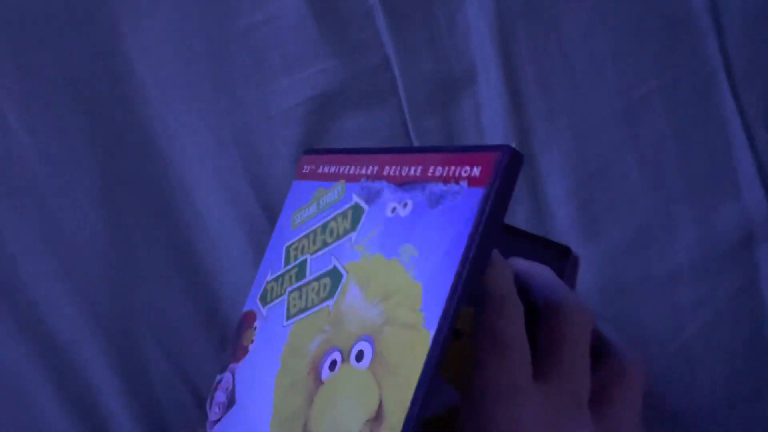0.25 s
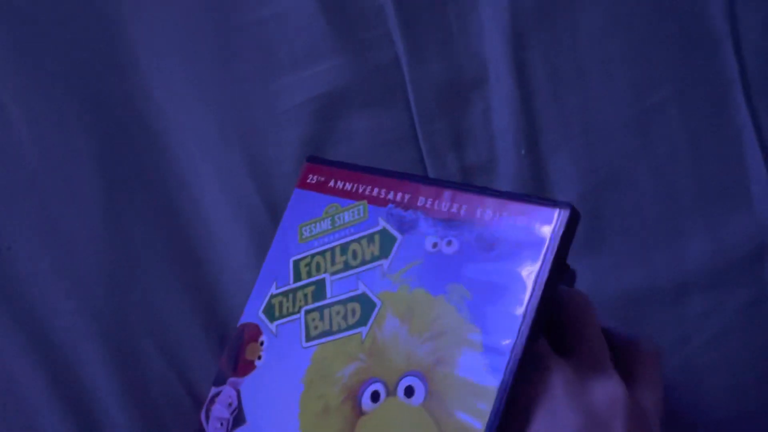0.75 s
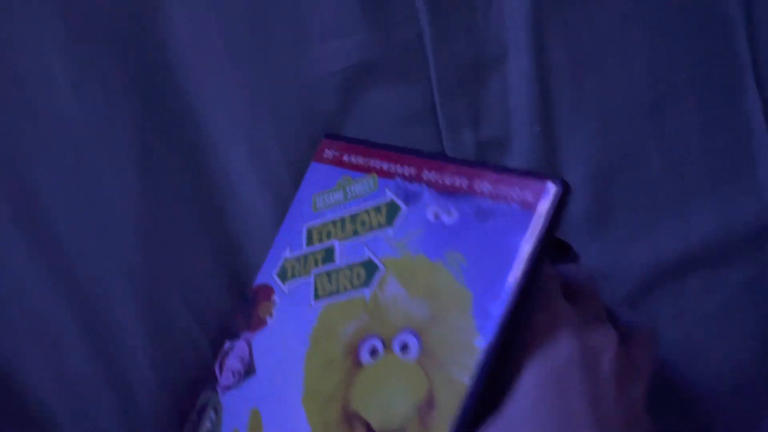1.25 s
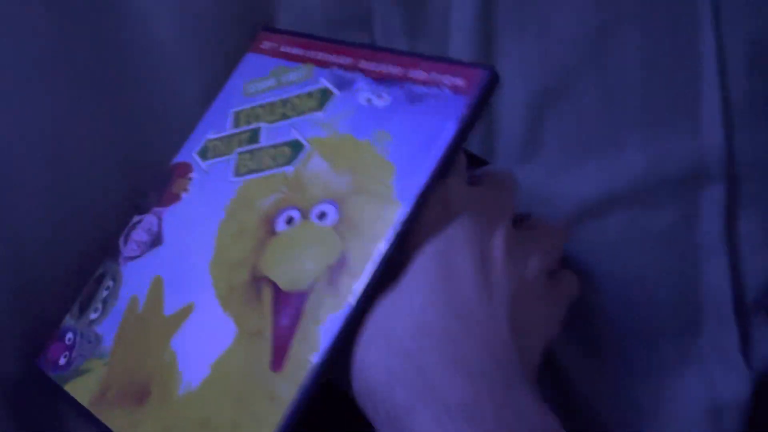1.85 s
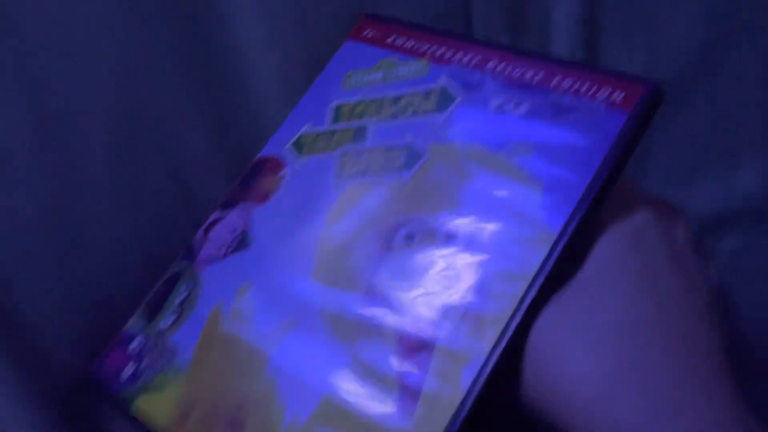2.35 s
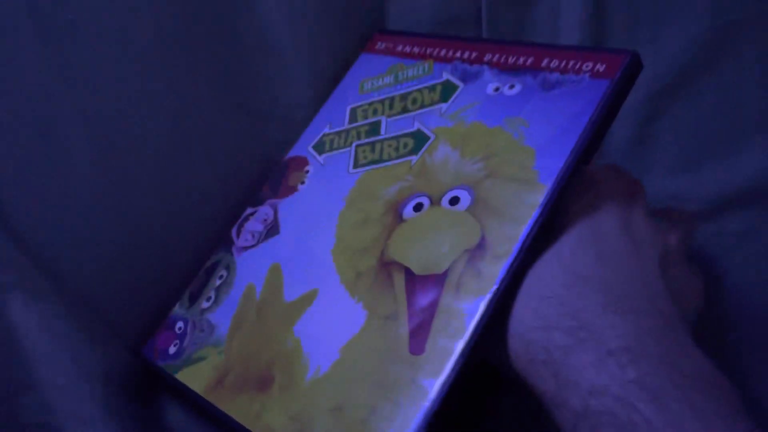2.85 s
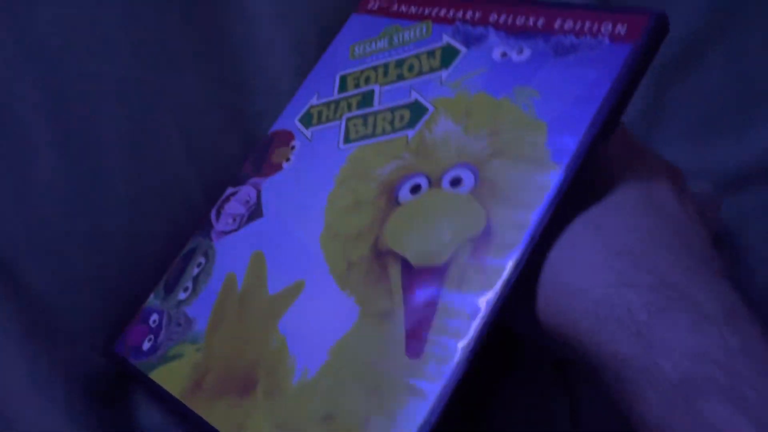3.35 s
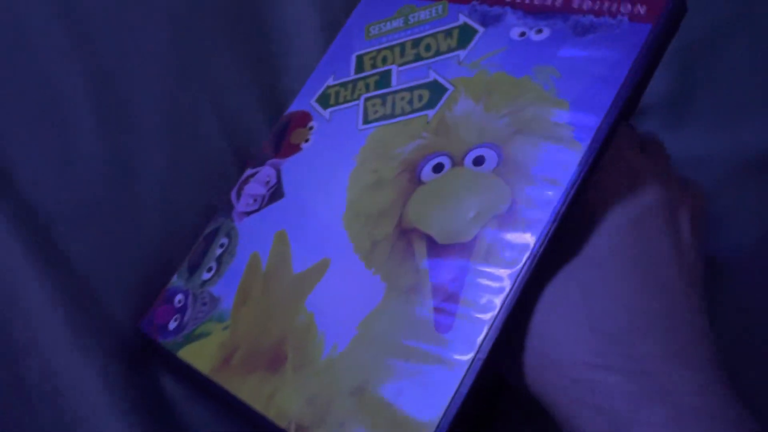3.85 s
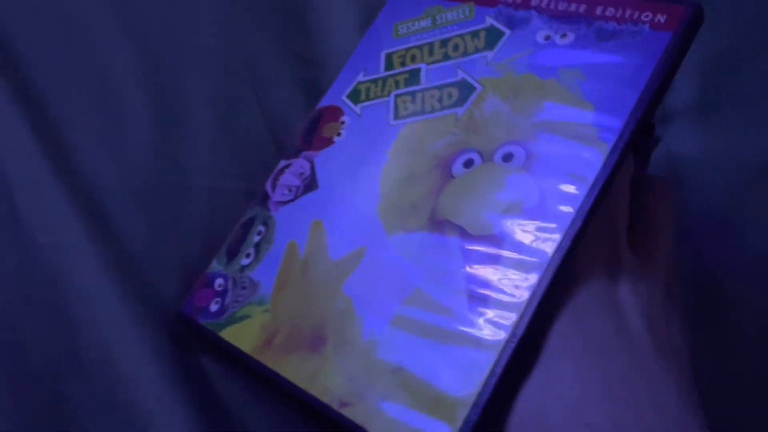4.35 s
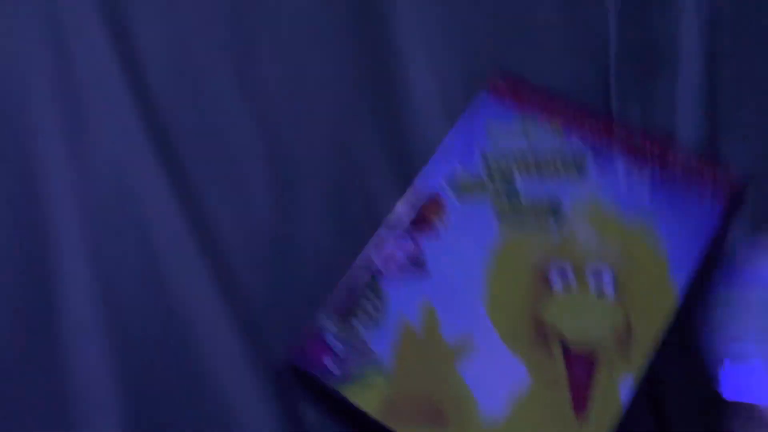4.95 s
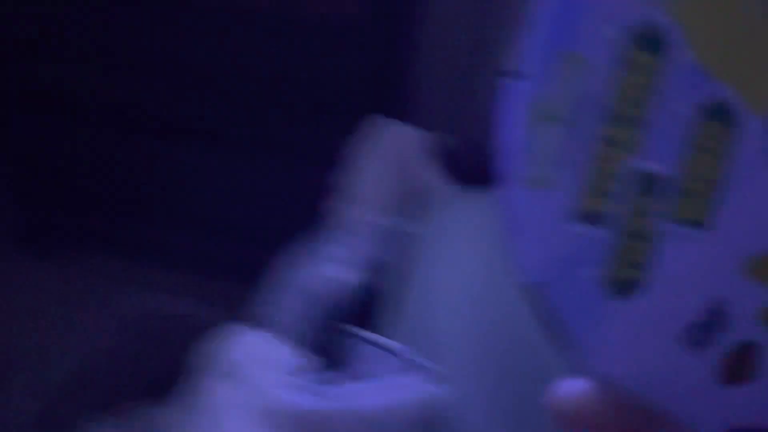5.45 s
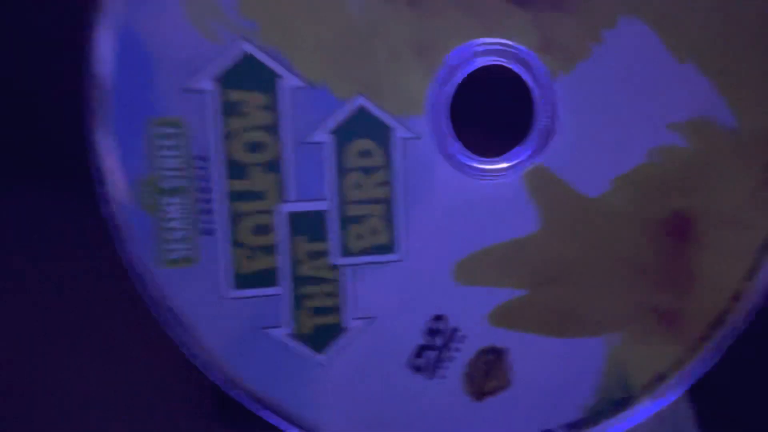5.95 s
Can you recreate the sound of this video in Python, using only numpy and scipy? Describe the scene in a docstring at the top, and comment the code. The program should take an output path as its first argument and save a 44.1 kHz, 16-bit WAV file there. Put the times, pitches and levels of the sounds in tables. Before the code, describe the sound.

A near stereo microphone catches skin rubbing and squeaking on thin plastic, dull padded knocks and cloth scuffs. The case snaps sharply, loudest just before three seconds, with a brief hollow ring. It calms into sparse ticks and light brushing, then clicks more weakly, bumps again and ends with soft sliding, all over a steady low hum and short room echoes.

```python
"""A steady fan-like hum, a sum of wavering sines in soft noise, lies under the handling of a half-closed
plastic case on a bed. First come padded thuds (stretching sines), ticks and sliding skin (random slips). From
1.2 s hub and disc snap as chirped impulses on a resonant shell, hardest near 2.9 s. Light ticks, two of them
bright nail ticks near 4.6 s, lead to weaker snaps at 4.9-5.0 s; after the last thuds and a sharp tick near 5.7
s the disc is lifted out and skin slides on. Near echoes and a small room surround all the handling."""
import sys
import numpy as np
from scipy import signal
from scipy.fft import rfft, irfft, next_fast_len
from scipy.io import wavfile

SR = 44100
rng = np.random.default_rng(int(sys.argv[2]) if len(sys.argv) > 2 else 0)


def log_audio(samples):
    """Write samples as a 16-bit WAV file to the path given in sys.argv[1]."""
    # one column per channel
    frames = np.atleast_2d(samples).T
    # limit to full scale, then quantise
    limited = np.clip(frames, -1, 1)
    pcm = np.round(limited * 32767).astype(np.int16)
    wavfile.write(sys.argv[1], SR, pcm)


N = 273861

# Steady tones of the hum. Each row: mean frequency in Hz, rms level in dB before its flutter.
HUM_TONES = [(91.5, -48), (150.7, -64), (180, -56.5), (276, -66.5)]
# Spectrum of the still air. Each row: frequency in Hz, relative density in dB per Hz.
AIR_SPECTRUM = [(20, -57), (40, -2.5), (65, 2.5), (110, 2.5), (190, -4), (300, -10.5), (550, -17),
                (950, -18.5), (2200, -22.5), (3200, -30), (5500, -44), (12000, -46.5), (15000, -64)]
# Decay of the room. Each row: frequency in Hz, t60 in s, level of the tail in dB.
ROOM_DECAY = [(100, 0.064, -17), (392, 0.13, -9), (1480, 0.23, -14.5), (3000, 0.24, -12.5),
              (5500, 0.28, -11.5), (11240, 0.18, -10.5), (16000, 0.11, -18)]
# Spacing of the microphone ports. Each row: frequency in Hz, left minus right in dB,
# phase by which left leads in radians.
PORT_DIFFERENCE = [(100, -1, .12), (350, .2, .22), (800, 2.3, .25), (1500, 3.2, .25), (2300, 3.7, .55),
                   (3700, 3.4, .35), (5100, 3.2, .9), (6800, 1, -.9), (7900, 0, -2.9), (8800, 0, -3.4),
                   (10400, 0, -5.9), (12800, 0, -6.9), (14200, 0, -9.1), (16500, 0, -10.1)]
# Weight of the part that sets the ports apart. Each row: frequency in Hz, gain in dB.
SIDE_SPECTRUM = [(200, 1.5), (1400, 8.5), (3500, 0.5), (5500, -4), (7000, 5), (7900, -21), (16000, -10)]
# Friction spectra of the scuffed sheet, the rubbing skin and the hiss of light sliding.
# Each row: frequency in Hz, relative density in dB per Hz.
SCUFF_SPECTRUM = [(40, 15), (80, 28), (200, 13.5), (400, 7), (800, -2), (1200, -8), (2200, -73),
                  (5000, -47)]
RUB_SPECTRUM = [(400, 9), (900, 3.5), (1400, 6), (2000, 6), (2700, -5), (3600, -34), (5000, -37.5),
                (9000, -44)]
HISS_SPECTRUM = [(1200, 4.5), (2800, -0.5), (4400, 3.5), (5600, 1), (7100, 1), (8300, -2), (9400, -1.5),
                 (12300, -8.5), (13600, -14), (15300, -4.5), (17000, -24)]
# Effort of the arm on the sheet. Each row: time in s, level of the scuff in dB.
ARM_EFFORT = [(0, -62.5), (.33, -80.5), (.52, -67), (.62, -96), (.92, -84), (1.2, -58.5), (1.45, -65.5),
              (1.68, -64.5), (2.02, -55), (2.2, -55.5), (2.45, -65), (2.8, -76.5), (3.27, -77.5),
              (3.7, -73), (4.45, -69), (5.25, -72.5), (5.47, -62), (5.52, -56), (5.9, -64), (6.2, -64)]
# Finger strokes over the plastic. Each row: start in s, length before the release in s, hiss in dB and
# rub in dB (both before the loss and sag of the stroke), brightness of the hiss in dB per octave.
FINGER_STROKES = [(0.15, 0.079, -60.5, -57, -6), (0.36, 0.084, -73.5, -62, 16.5),
                  (0.622, 0.18, -64.5, -78, -7), (1.166, 0.1, -46, -64, -1), (1.295, 0.08, -50.5, -61, -2),
                  (1.49, 0.041, -54, -37, 5), (1.746, .11, -56, -60, 3), (1.936, 0.12, -78, -86, -6),
                  (2.206, 0.14, -55.5, -79, 3), (2.51, 0.036, -48.5, -45, -1),
                  (2.572, 0.074, -55.5, -47.5, -6), (3.187, 0.041, -66, -76, 5),
                  (3.348, 0.19, -64.5, -83, 3), (3.601, 0.093, -57, -71, -2.5),
                  (3.804, 0.091, -59.5, -85, -8), (4.026, 0.12, -55, -68, -2), (4.214, 0.062, -66, -91, -8),
                  (4.423, 0.031, -60, -86, -12), (4.51, 0.12, -59, -56, -10), (4.57, 0.083, -51.5, -78, -3),
                  (4.62, 0.078, -60, -65, 2), (4.716, 0.021, -50, -55, 3), (4.774, 0.068, -94, -60, 40),
                  (5.059, 0.051, -49.5, -50, 1.5), (5.146, 0.031, -46, -57, 2.5),
                  (5.2, 0.13, -52.5, -55.5, 2), (5.356, 0.29, -63, -48, -4), (5.934, 0.15, -74, -51, 16),
                  (6.103, 0.27, -83, -54.5, 20)]
# Stick-slip of dragged fingertips. Each row: start in s, length in s, level of the ring in dB,
# resonance at the start in Hz, resonance at the end in Hz, width of each resonator in Hz, level of the
# crisp edge in dB, swell from start to end in dB, mean slips per s. Both levels precede the grip envelope.
FINGER_DRAGS = [(0.507, 0.032, -50.5, 1180, 675, 616, -62, -3, 390),
                (0.536, 0.042, -50.5, 1060, 704, 600, -61.5, 6, 310),
                (0.666, 0.084, -67.5, 4250, 4230, 700, -80, 2, 900),
                (0.797, 0.041, -52.5, 656, 735, 600, -62.5, 7, 370),
                (1.792, 0.049, -59, 1190, 1500, 1300, -74, 3, 350),
                (1.974, 0.24, -60, 750, 650, 1000, -65.5, -5, 300),
                (2.027, 0.18, -65, 3200, 2700, 1590, -76, 6, 320),
                (2.278, 0.11, -54, 1590, 1610, 750, -75, 0, 700),
                (2.519, 0.076, -53, 1280, 1360, 260, -78, -4, 900),
                (2.597, 0.041, -53.5, 1450, 1850, 1000, -62, 10, 550),
                (4.511, 0.039, -57, 1720, 1100, 1200, -65, 7, 450),
                (4.542, 0.045, -51, 960, 680, 450, -75, -2, 700),
                (4.577, 0.042, -52, 1910, 2130, 600, -55, 11, 500),
                (4.597, 0.13, -60, 6900, 6700, 1600, -87, -6, 900),
                (4.625, 0.11, -64, 3950, 4100, 330, -80, -3, 450),
                (5.379, 0.26, -56, 1530, 1900, 744, -79, -4, 810),
                (5.446, 0.17, -55, 734, 1010, 1100, -82, 5, 300),
                (5.755, 0.096, -52.5, 650, 480, 700, -85, -3, 350)]
# Padded thuds of the shell. Each row: start in s, starting pitch in Hz before the lowest note raises it,
# first knock in dB, following heave in dB, length of the heave in s.
SHELL_THUDS = [(0.435, 123, -69, -35, 0.052), (1.069, 413, -33, -37, 0.035),
               (1.092, 107, -53, -31.5, 0.033), (1.742, 458, -30.5, -36.5, 0.058),
               (1.926, 475, -44.5, -66, 0.051), (1.972, 690, -35, -70, 0.014),
               (1.993, 1260, -43, -58, 0.013), (2.092, 460, -40.5, -48, 0.015),
               (2.11, 172, -49, -29, 0.043), (2.153, 100, -45, -34.5, 0.036), (2.23, 315, -36, -37, 0.033),
               (2.582, 780, -36, -37, 0.014), (2.592, 199, -27.5, -17, 0.058),
               (2.643, 107, -60, -20.5, 0.048), (2.687, 111, -50, -31.5, 0.083),
               (2.778, 730, -44, -35, 0.059), (3.665, 281, -51, -36, 0.017), (4.199, 514, -42, -61, 0.04),
               (5.493, 263.4, -32, -23.5, 0.062), (5.532, 103, -49, -26.5, 0.036),
               (5.662, 796, -39, -29.5, 0.038), (5.74, 815, -50, -35, 0.015),
               (5.752, 248, -29, -30.5, 0.048), (5.775, 100, -63, -33.5, 0.04)]
# Resonances and dips of the shell. Each row: frequency in Hz, width in Hz, height in dB.
SHELL_MODES = [(240.4, 76, 8.5), (673, 200, 5), (1613, 89, -14.5), (1662, 103, 10), (3010, 1010, 0),
               (6380, 460, -0.5)]
# Spectrum common to all light touches. Each row: frequency in Hz, level in dB.
TOUCH_SPECTRUM = [(100, -30.5), (320, 5), (600, -2), (2000, -5), (8000, -22), (16000, -32)]
# Ticks of nails and disc edge. Each row: start in s, level in dB added to the touch spectrum,
# brightness in dB per octave, note of the touched patch in Hz.
LIGHT_TICKS = [(0.166, -19.5, 1.5, 2020), (.455, -15, -1, 1140), (1.516, -11, 9, 4970),
               (2.028, -19, -1, 3150), (2.518, -24, 9, 1400), (3.394, -25, -4, 630), (3.415, -24, -4, 2800),
               (3.502, -18, -4, 1180), (3.506, -21, -4.5, 1150), (3.663, -19.5, -4.5, 1180),
               (3.682, -21, -6, 710), (3.698, -14.5, -2, 895), (3.818, -17, -2, 3940),
               (4.05, -18, -1.5, 860), (4.198, -22, -4.5, 2270), (4.438, -16.5, -2, 1180),
               (4.608, -14.5, 2.5, 2400), (4.785, -18, -1.5, 1960), (4.923, -7, -0.5, 1360),
               (5.036, -27, 7, 2400), (5.7384, -8, -3, 1720), (5.752, -14, -4, 1710)]
# Frequencies in Hz at which the spectrum of every snap is given.
SNAP_BANDS_HZ = [90, 230, 450, 1200, 2800, 5500, 13000]
# Snaps of hub and shell, plus two bright nail ticks near 4.6 s (rows 4.553 and 4.6228) rendered the same way.
# Each row: time in s, travel time of the bending wave at 1 kHz in s, # strength of the rebound (0-1), list of
# levels in dB at the snap bands, and list of notes that the # gripped shell rings at or damps, each a frequency
# in Hz and a height in dB.
HUB_SNAPS = [(1.176, 0.0014, 0.045, [2, 12, 7, 1, 1, -10.5, -11.5], [(2450, 11), (4620, 14), (1210, 6),
             (1720, -7), (3650, -11)]), (1.506, 0.0017, 0.082, [27.5, 18, 17, 9, 8, -5, -3], [(680, 7),
             (1430, 13.5), (1950, -8), (2370, 16.5), (2720, -11), (3200, 9.5), (4600, 5), (5700, 7.5)]),
             (2.2527, 0.001, 0.17, [-2, -15, -29, -6.5, -4.5, -6.5, -8.5], [(1670, 4), (2080, 5.5),
             (3050, 11)]), (2.8725, 0.00154, 0, [0, 17, 16, 17, 10.5, 0, -6], [(560, -27), (780, 6),
             (1144, 9), (1680, -8.5), (2000, 6.5), (2500, -5), (2950, 12), (3750, 1.5), (4600, -8),
             (6400, 4)]), (2.9, 0.0022, 0.26, [27, 22, 12, 14, 10, 2, -1.5], [(740, 9.5), (1050, 6.5),
             (1530, 5), (2250, 0.5), (2680, 10), (4600, -9), (6600, 5)]),
             (4.553, 0.0015, 0, [-11, -6.5, -10, -11, -12.5, -22, -34], [(1200, 10), (3500, 8.5)]),
             (4.6228, 0.00089, 0, [-24, -30, -23, -14, -16, -14, -23.5], [(3800, 6)]),
             (4.9126, 0.0013, 0.061, [-3, -7, -5.5, 0, -9.5, -2.5, -25], [(670, 7.5), (950, 19), (1350, 8),
             (1830, 15.5)]), (5.025, 0.0016, 0.16, [-15, -12, -16, -15.5, -28, -26.5, -29], [(1150, 12.5),
             (1480, 14), (2400, 20)])]
# Modes that linger after a snap. Each row: frequency in Hz, gain at the peak in dB, t60 in s.
LINGERING_MODES = [(788, -11, 0.6), (958, -13, 0.12), (1333, -8, .24), (1620, -12, 0.17), (2358, -2, .28),
                   (2611, -8, 0.3), (3450, -8, 0.26), (5420, 3, .28), (6800, -1, 0.18)]

AIR_DB = -52
BAND_LIMIT_HZ = 16400
STRIKE_SIZE = 4096  # samples in one blow
STRIKE_HZ = np.maximum(np.fft.rfftfreq(STRIKE_SIZE, 1 / SR), 1)
TIME = np.arange(N) / SR
STROKE_ATTACK_S, STROKE_RELEASE_S = 0.023, 0.015
STROKE_LOSS_DB, STROKE_SAG_DB = 10, 4  # loss throughout, and further fall along the stroke
REBOUND_S = 0.0026  # delay of the single bounce of the catch


def gain_of(db):
    """Converts decibels to an amplitude ratio."""
    return 10 ** (np.asarray(db) / 20)


def evened(x):
    """Normalizes a signal to an rms of 1."""
    return x / np.sqrt(np.mean(x ** 2) + 1e-20)


def read(points, hz, axis=1):
    """Interpolates one column of a table linearly over log frequency."""
    points = np.array(points, float)
    return np.interp(np.log(hz + 1), np.log(points[:, 0] + 1), points[:, axis])


def add(mix, s, sound):
    """Superposes a sound on the mix, starting at s seconds."""
    part = mix[max(round(s * SR), 0):][:len(sound)]
    part += sound[:len(part)]


def coloured(x, spectrum, band_hz=(0, SR)):
    """Shapes a signal by a linear filter and normalizes its rms inside the band to 1."""
    hz = np.fft.rfftfreq(N, 1 / SR)
    shaped = rfft(x) * gain_of(read(spectrum, hz))
    in_band = (hz >= band_hz[0]) * (hz <= band_hz[1])
    return irfft(shaped, N) / np.std(irfft(shaped * in_band, N))


def wander(per_s):
    """Produces a slow random fluctuation of rms 1 by Gaussian low-pass filtering of noise."""
    hz = np.fft.rfftfreq(N, 1 / SR)
    noise = rfft(rng.standard_normal(N))
    return evened(irfft(noise * np.exp(-(hz / per_s) ** 2), N))


def highpassed(x, cutoff_hz):
    """Attenuates long waves at 6 dB per octave below the cutoff."""
    return signal.lfilter(*signal.butter(1, cutoff_hz, "high", fs=SR), x)


def stereo(middle, side):
    """Forms left and right as the sum and difference of shared and differing waves."""
    side_gain = gain_of(read(SIDE_SPECTRUM, np.fft.rfftfreq(N, 1 / SR)))
    side = irfft(rfft(side) * side_gain, N)
    return np.array([middle + side, middle - side])


def background(waver=0.00382, flutter=0.13):
    """Superposes tones with slight frequency and amplitude modulation on diffuse room noise."""
    hum = np.zeros(N)
    for hz, db in HUM_TONES:
        amplitude = gain_of(db) * np.sqrt(2) * (1 + flutter * wander(2.0))
        pitch_hz = hz * (1 + waver * wander(4.2))
        hum += amplitude * np.sin(2 * np.pi * np.cumsum(pitch_hz) / SR)
    middle, side = coloured(rng.standard_normal((2, N)), AIR_SPECTRUM)
    # long waves reach both ports nearly alike
    side = 0.24 * side + 0.18 * highpassed(side, 500)
    return hum + gain_of(AIR_DB) * stereo(middle, side)


def room(x, first_s=0.0058, reflections_per_s=4000):
    """Reverberation: sparse wall reflections decay exponentially, each band at its own rate."""
    count = SR // 2
    t = np.arange(count) / SR
    present = rng.random((2, count)) < reflections_per_s / SR
    taps = rng.standard_normal((2, count)) * present * (t > first_s)
    hz, frame_s, z = signal.stft(evened(taps), SR, nperseg=256)
    t60 = read(ROOM_DECAY, hz)[:, None]
    level_db = read(ROOM_DECAY, hz, axis=2)[:, None]
    fall = np.log(1000) / t60
    # the square root keeps the energy of the tail independent of its decay time
    z = z * gain_of(level_db) * np.sqrt(2 * fall / SR) * np.exp(-fall * frame_s)
    z[1] *= 0.75 * (hz / (hz + 700))[:, None]  # mainly short waves differ between the ports
    response = signal.istft(z, SR, nperseg=256)[1]
    middle, side = signal.fftconvolve(x[None], response, axes=1)[:, :N]
    return stereo(middle, side)


def echoes(x, count=7):
    """Early reflection: sparse delays of 0.5 to 5 ms, one set shared by the ports and one differing."""
    taps = np.zeros((2, SR // 200))
    delays = rng.integers(SR // 2000, SR // 200, (2, count))
    signs = rng.choice([-1, 1], (2, count))
    np.put_along_axis(taps, delays, signs / np.sqrt(count), 1)
    return signal.oaconvolve(x[None], taps, axes=1)[:, :N]


def nearby(x, shared=0.86, apart=0.51, moves_per_s=7, count=6):
    """Interference: hand, lid and camera body reflect short waves in a pattern that shifts as they move."""
    short_waves = highpassed(x, 900)
    poses = np.array([wander(moves_per_s) for _ in range(count)])
    poses /= np.linalg.norm(poses, axis=0)
    middle, side = sum(echoes(pose * short_waves) for pose in poses)
    return stereo(x + shared * middle, apart * side)


def friction(spectrum, band_hz, slips_per_s, grain_db, uneven_db):
    """Sliding friction: random slips of unequal size under wavering pressure, with rms 1 in the band."""
    size = gain_of(grain_db * np.minimum(rng.exponential(1, N), 4))
    occurs = rng.random(N) < slips_per_s / SR
    slips = rng.standard_normal(N) * size * occurs
    pressure = evened(gain_of(uneven_db * wander(27)))
    return coloured(slips * pressure, spectrum, band_hz)


def strokes(rub, hiss, pivot_hz=5500):
    """Friction follows speed: a finger sets off, slows and lifts, with dull rub under tilted hiss."""
    out = np.zeros(N)
    for s, length_s, hiss_db, rub_db, brightness in FINGER_STROKES:
        first = max(round(s * SR), 0)
        last = min(round((s + length_s + 6 * STROKE_RELEASE_S) * SR), N)
        part = slice(first, last)
        t = TIME[part] - TIME[part][0]
        attack = np.minimum(t / STROKE_ATTACK_S, 1)
        release = np.exp(-np.maximum(t - length_s, 0) / STROKE_RELEASE_S)
        sag = gain_of(-STROKE_LOSS_DB - STROKE_SAG_DB * np.minimum(t / length_s, 1))
        envelope = attack * release * sag
        hz = np.clip(np.fft.rfftfreq(len(t), 1 / SR), 3500, 13000)
        tilt_db = brightness * np.log2(hz / pivot_hz)
        tilted_hiss = irfft(rfft(hiss[part]) * gain_of(hiss_db + tilt_db), len(t))
        add(out, s, envelope * (tilted_hiss + gain_of(rub_db) * rub[part]))
    return out


def sliding(usual_db=-60, rub_db=-63, hiss_db=-68, rub_follow=0.67, hiss_follow=0.95):
    """Coupled friction: the arm scuffs the sheet and drags the hand on plastic, while fingers stroke it."""
    scuff = friction(SCUFF_SPECTRUM, (350, 900), slips_per_s=2900, grain_db=1, uneven_db=-5.5)
    rub = friction(RUB_SPECTRUM, (1200, 2600), slips_per_s=3500, grain_db=3.3, uneven_db=1.3)
    hiss = friction(HISS_SPECTRUM, (4000, 7500), slips_per_s=5500, grain_db=3.7, uneven_db=1.6)
    arm_db = np.interp(TIME, *np.transpose(ARM_EFFORT))
    effort_db = arm_db - usual_db
    hand_rub = gain_of(rub_db + rub_follow * effort_db) * rub
    hand_hiss = gain_of(hiss_db + hiss_follow * effort_db) * hiss
    return gain_of(arm_db) * scuff + hand_rub + hand_hiss + strokes(rub, hiss)


def resonate(x, hz, width):
    """Resonance: a one-pole filter in a rotating frame follows the curve hz with a peak gain of 1."""
    turn = np.exp(2j * np.pi * np.cumsum(hz) / SR)
    r = np.exp(-np.pi * width / SR)
    return 2 * (turn * signal.lfilter([1 - r], [1, -r], x / turn)).real


def drags(grain_db=2.5, irregular=0.7, release_s=0.014, lowest_hz=300, crisp_band_hz=(1950, 3400)):
    """Stick-slip: skin jumps in jerks, which the pressed patch filters and the shell gives a crisp edge."""
    out = np.zeros(N)
    shell = signal.butter(3, crisp_band_hz, "band", fs=SR, output="sos")
    stiff = signal.butter(2, lowest_hz, "high", fs=SR, output="sos")
    for s, length_s, db, start_hz, end_hz, width, crisp_db, swell_db, slips_per_s in FINGER_DRAGS:
        count = round(length_s * SR)
        size, wait, sign = rng.random((3, SR // 100))
        waits = 1 + irregular * (2 * wait - 1)  # in mean slip periods
        at = (np.cumsum(waits) / slips_per_s * SR).astype(int)
        jerks = np.sign(sign - 0.5) * gain_of(-grain_db * np.log(size + 0.071))
        impulses = np.bincount(at - at[0], jerks, count)[:count]
        slips = signal.sosfilt(stiff, impulses)
        hz = np.linspace(start_hz, end_hz, count)
        ring = resonate(resonate(slips, hz, width), hz, width)
        crisp = signal.sosfilt(shell, slips)
        done = np.linspace(0, 1, count)
        release = np.minimum(1, (1 - done) * length_s / release_s)
        grip = release * gain_of(swell_db * (done - 0.5))
        add(out, s, (gain_of(db) * evened(ring) + gain_of(crisp_db) * evened(crisp)) * grip)
    return out


def thuds(stretch=0.2434, lowest_hz=86, knock_s=0.002, rough=0.28, creak_ratio=1.6):
    """Dispersion: long waves arrive last, so the period stretches until it nears the shell's lowest note."""
    out = np.zeros(N)
    t = np.arange(SR // 6) / SR
    creak_filter = signal.butter(2, 80, fs=SR, output="sos")
    for s, start_hz, knock_db, heave_db, length_s in SHELL_THUDS:
        period_s = 1 / start_hz + stretch * t
        hz = (lowest_hz ** 4 + period_s ** -4) ** (1 / 4)
        angle = 2 * np.pi * np.cumsum(hz) / SR
        knock = t / knock_s * np.exp(1 - t / knock_s)
        heave = np.sin(np.pi * np.minimum(t / length_s, 1)) ** 2
        creak = evened(signal.sosfilt(creak_filter, rng.standard_normal(len(t))))
        wave = np.sin(angle) + rough * creak * np.sin(creak_ratio * angle)
        add(out, s, (gain_of(knock_db) * knock + gain_of(heave_db) * heave) * wave)
    return out


def peak(hz, width, db):
    """Gives a Lorentzian resonance curve in dB, at half its height half a width off centre."""
    return db / (1 + (2 * (STRIKE_HZ - hz) / width) ** 2)


def strike(colour_db, travel_s, scatter, scatter_s, edge_echo=0.22, edge_path=1.63,
           edge_loss_hz=2500, rise_s=0.0022, scatter_hz=6000):
    """Bending-wave dispersion: treble travels fastest, so a blow becomes a tiny falling chirp."""
    modes_db = sum(peak(*mode) for mode in SHELL_MODES)
    bass_cut_db = 10 * np.log10(1 + (62 / STRIKE_HZ) ** 6)
    shape_db = colour_db + modes_db - bass_cut_db
    log_gain = np.log(gain_of(np.maximum(shape_db, -100)))
    # the Hilbert transform supplies the minimum phase of this spectrum
    mirrored = np.r_[log_gain, log_gain[-2:0:-1]]
    causal = np.conj(signal.hilbert(mirrored))[:len(STRIKE_HZ)]
    lag = 4 * np.pi * travel_s * np.sqrt(STRIKE_HZ * 1000)  # group delay at 1 kHz is travel_s
    # the wave returns from the far edge, later and duller
    returned = 1 + edge_echo * np.exp(-1j * edge_path * lag) / (1 + STRIKE_HZ / edge_loss_hz)
    # ribs and edges scatter the short waves into a brief spray
    t = np.arange(STRIKE_SIZE) / SR
    spray = rng.standard_normal(STRIKE_SIZE) * np.exp(-t / scatter_s) * (1 - np.exp(-t / rise_s))
    share = scatter * STRIKE_HZ ** 2 / (STRIKE_HZ ** 2 + scatter_hz ** 2)
    scattered = rfft(spray / np.linalg.norm(spray))
    spread = np.sqrt(1 - share) + np.sqrt(share) * scattered
    return irfft(np.exp(causal - 1j * lag) * returned * spread)


def touch(db, brightness, note_hz, note_db=8, note_width=0.3, travel_s=0.001115,
          scatter=0.7, scatter_s=0.0013, pivot_hz=2000):
    """Local excitation: a light touch rings one patch, and a harder tip excites more treble."""
    octaves = np.log2(np.clip(STRIKE_HZ, 500, 9000) / pivot_hz)
    note = peak(note_hz, note_width * note_hz, note_db)
    colour_db = read(TOUCH_SPECTRUM, STRIKE_HZ) + db + brightness * octaves + note
    return strike(colour_db, travel_s, scatter, scatter_s)


def ticks(tap_db=13, tap_brightness=-4.0):
    """Contact impulses: nails and disc edge tick the plastic, and a dull tap opens every thud."""
    out = np.zeros(N)
    for s, db, brightness, note_hz in LIGHT_TICKS:
        add(out, s, touch(db, brightness, note_hz))
    for s, start_hz, knock_db, _, _ in SHELL_THUDS:
        add(out, s, touch(knock_db + tap_db, tap_brightness, start_hz))
    return out


def after_ring(x):
    """Free vibration: the thin plastic sings on at its freest modes, which decay exponentially."""
    t = np.arange(SR // 2) / SR
    tones = np.zeros(len(t))
    for hz, db, t60 in LINGERING_MODES:
        fall = np.log(1000) / t60
        amplitude = gain_of(db) * 2 * fall / SR  # makes db the gain at resonance
        tones += amplitude * np.exp(-fall * t) * np.sin(2 * np.pi * hz * t)
    return signal.fftconvolve(x, tones)[:N]


def snaps(scatter=0.98, scatter_s=0.0013, ring_width=0.18, lead_s=0.0005, radiated_ring=0.27):
    """Impulsive release: the hub catches and lets go, and the grip decides which notes of the shell ring.
    Gives the near sound, and the smoother sum over all directions that fills the room."""
    near, radiated = np.zeros((2, N))
    for s, travel_s, rebound, band_db, notes in HUB_SNAPS:
        start_s = s - lead_s
        colour_db = read(list(zip(SNAP_BANDS_HZ, band_db)), STRIKE_HZ)
        notes_db = sum(peak(hz, ring_width * hz, db) for hz, db in notes)
        crack = strike(colour_db + notes_db, travel_s, scatter, scatter_s)
        add(near, start_s, crack)
        # the rebound is too light to push the whole shell, so its bass is thin
        add(near, start_s + REBOUND_S, rebound * highpassed(crack, 400))
        smooth_db = colour_db + radiated_ring * notes_db
        add(radiated, start_s, strike(smooth_db, travel_s, 0, scatter_s))
    return near, radiated


def scene():
    """Superposition: the direct handling, its near and room reflections, and the hum add linearly."""
    near, radiated = snaps()
    handling = thuds() + ticks() + sliding() + drags()
    snapping = nearby(near + after_ring(radiated), shared=0, apart=0.16)
    direct = snapping + nearby(handling)
    return direct + room(radiated + handling) + background()


def record(dry):
    """Two-port reception: the ports differ in level and phase, then a low-pass limits the band."""
    size = next_fast_len(N + STRIKE_SIZE)
    hz = np.fft.rfftfreq(size, 1 / SR)
    lean_db = read(PORT_DIFFERENCE, hz)
    lead = read(PORT_DIFFERENCE, hz, axis=2)
    left = gain_of(lean_db / 2)
    right = gain_of(-lean_db / 2) * np.exp(-1j * lead)
    heard = irfft(rfft(dry, size) * np.array([left, right]), size)[:, :N]
    lowpass = signal.firwin(255, BAND_LIMIT_HZ, window=("kaiser", 9), fs=SR)
    return signal.oaconvolve(heard, lowpass[None], "same")


dry = scene()
out = record(dry)
log_audio(out)
```